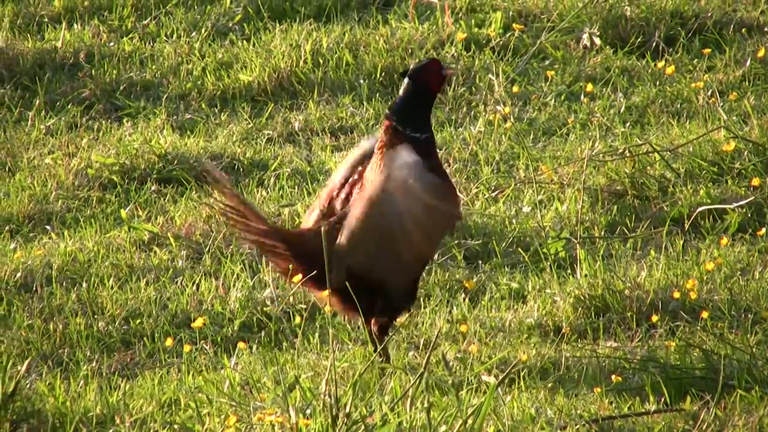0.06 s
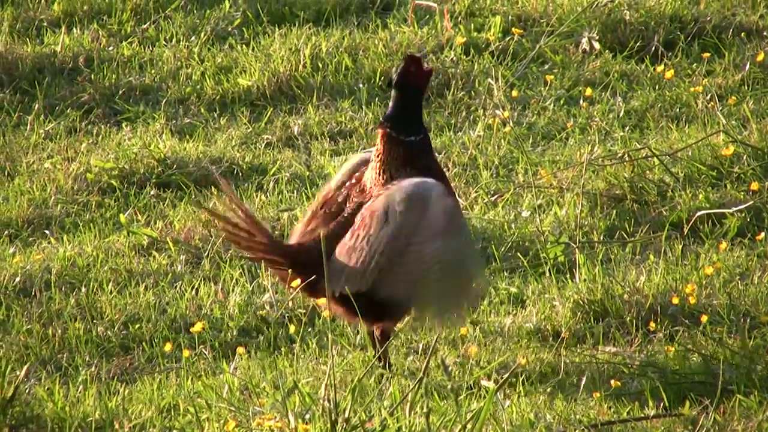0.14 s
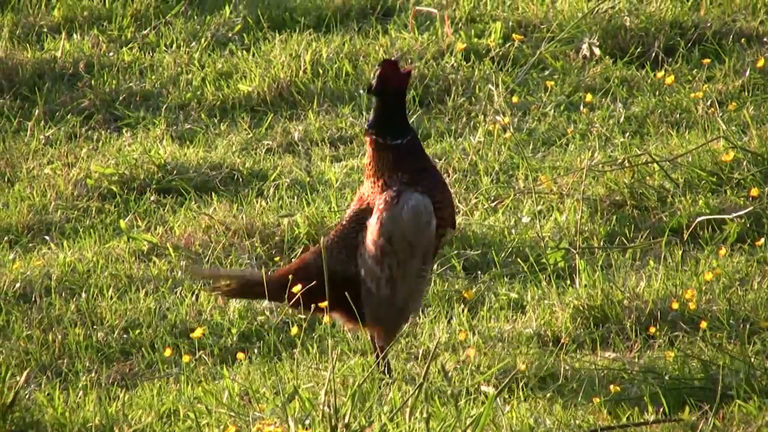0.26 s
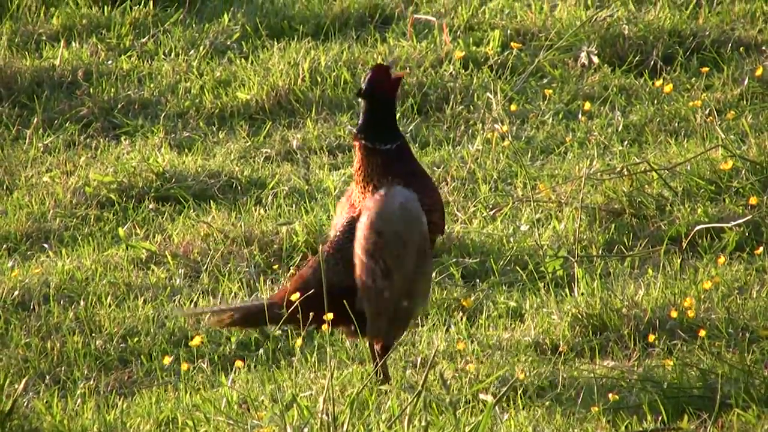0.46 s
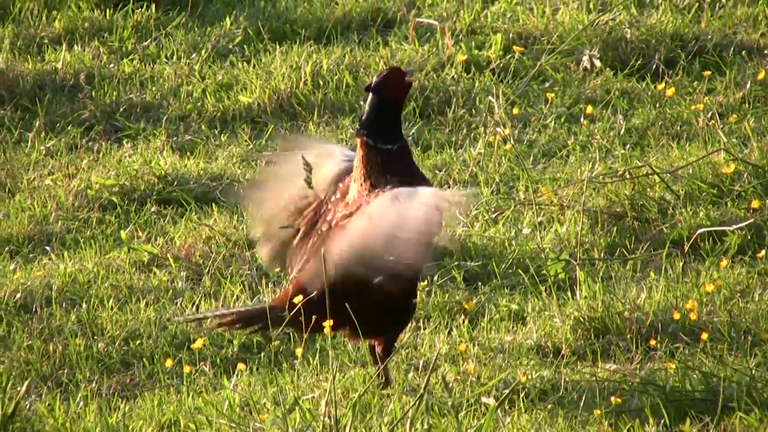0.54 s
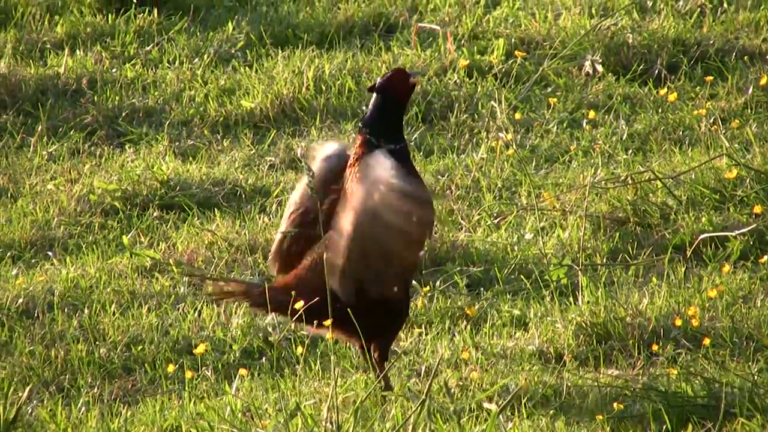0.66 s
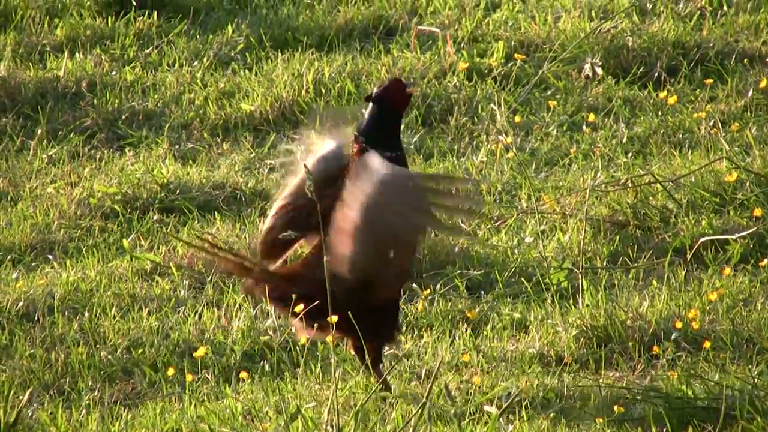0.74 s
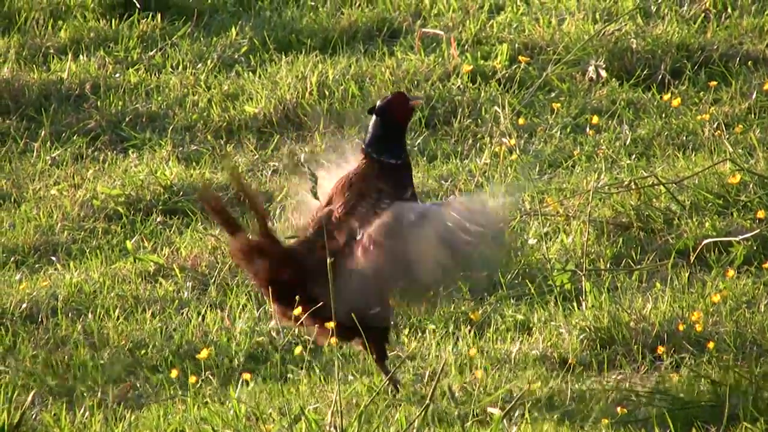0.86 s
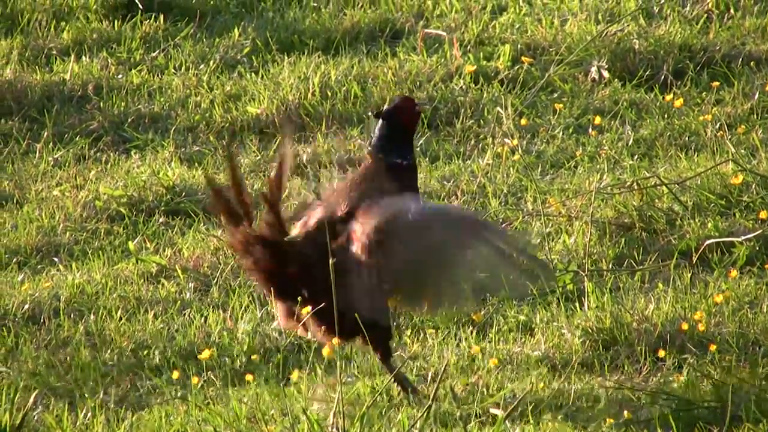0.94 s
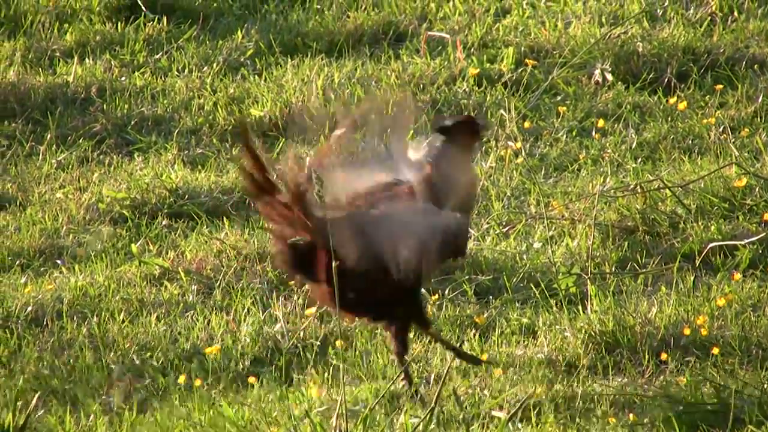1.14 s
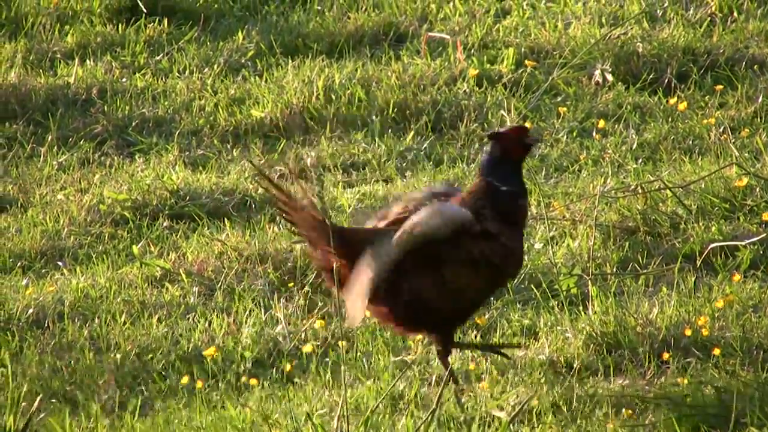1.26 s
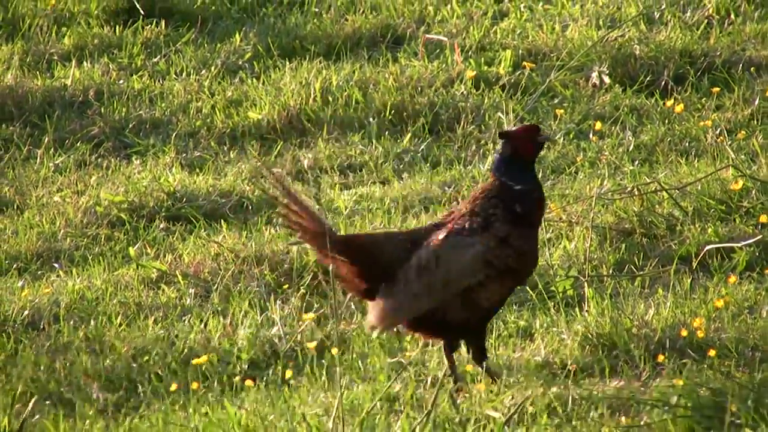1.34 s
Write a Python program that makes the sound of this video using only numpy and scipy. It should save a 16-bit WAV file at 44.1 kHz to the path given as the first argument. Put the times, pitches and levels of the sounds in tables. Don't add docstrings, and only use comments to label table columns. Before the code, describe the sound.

A cock pheasant close by gives a harsh, raspy two-note crow, then a fast run of soft, thumping, feathery wingbeats. Open meadow, faint hedge echoes, quiet insect hiss and distant wash, stereo microphone.

```python
import sys
import numpy as np
from scipy import signal
from scipy.fft import rfft, irfft
from scipy.io import wavfile
from scipy.ndimage import uniform_filter1d

SR = 44100
rng = np.random.default_rng(int(sys.argv[2]) if len(sys.argv) > 2 else 0)


def master_out(mix):
    frames = np.transpose(np.atleast_2d(mix))
    ceiling = np.clip(frames, -1, 1)
    pcm = np.round(ceiling * 32767).astype(np.int16)
    wavfile.write(sys.argv[1], SR, pcm)


def natural_amplitude(level_db):
    exponent = np.asarray(level_db, float) / 20
    return 10 ** exponent


N = 61739


def evened(x):
    return x / np.sqrt(np.mean(abs(x) ** 2) + 1e-20)


def read(points, hz):
    f, value = np.transpose(points)
    return np.interp(np.log(hz + 1), np.log(f + 1), value)


def add(mix, s, sound):
    part = mix[round(s * SR):][:len(sound)]
    part += sound[:len(part)]


def smooth(x, width_hz):
    r = np.exp(-np.pi * abs(width_hz) / SR)
    return signal.lfilter([1 - r], [1, -r], x)


def resonate(x, hz, width_hz):
    turn = np.exp(2j * np.pi * np.cumsum(hz * np.ones(len(x))) / SR)
    return 2 * (turn * smooth(smooth(x / turn, width_hz), width_hz)).real


def coloured(x, spectrum):
    gain = natural_amplitude(read(spectrum, np.fft.rfftfreq(x.shape[-1], 1 / SR)))
    return irfft(rfft(x) * gain, x.shape[-1])


RING_PER_PULSE, THIRD_DB = 3, -18
JITTER_TURNS, SHIMMER_DB, BREATH_SHARE, WANDER_HZ = .4, 2.2, .42, 110.
STRETCH_FROM_HZ, EDGE_S, DULLING_DB_PER_OCTAVE_DB = 2500, .004, .3
# f/Hz, width/Hz, level/dB
HISS = [(2400, 3300, -27.5), (4480, 3530, -20.5), (12000, 340, -35)]


def note(rows, looseness, stretching, pipe):
    t, columns = np.arange(N) / SR, np.transpose(rows)
    times = columns[0]
    hz, ring_db, rasp_db = (np.interp(t, times, c) for c in columns[1:])
    on = np.clip(np.minimum(t - times[0], times[-1] - t) / EDGE_S, 0, 1)
    loose, stretch = np.interp(t, times, looseness), np.interp(t, times, stretching)
    a, b, jitter, shimmer, breath = rng.standard_normal((N, 5)).T

    wobble = evened(smooth(smooth(a + 1j * b, WANDER_HZ), 2 * WANDER_HZ))
    wobble = evened(wobble / np.sqrt(abs(wobble) + 1e-9))
    angle = 2 * np.pi * np.cumsum(hz) / SR
    footing = np.sqrt(1 - loose ** 2) + loose * wobble
    ring = np.sqrt(2) * (footing * np.exp(1j * angle)).real
    ring += natural_amplitude(THIRD_DB) * (1 - loose) * np.cos(3 * angle)

    turns = angle / (2 * np.pi * RING_PER_PULSE)
    turns += JITTER_TURNS * loose * evened(smooth(smooth(jitter, 300), 300))
    pulses = (np.diff(np.floor(turns), prepend=0) != 0) * natural_amplitude(SHIMMER_DB * loose * shimmer)
    puffs = (.35 + np.exp(-(turns % 1) / .35)) * breath
    share = BREATH_SHARE * np.sqrt(loose)
    drive = (1 - share) * evened(pulses) + share * evened(puffs)

    slack_db = DULLING_DB_PER_OCTAVE_DB * np.maximum(rasp_db - rasp_db.max(), -15)
    rasp = np.zeros(N)
    for k, (f, width, db) in enumerate(pipe):
        gain = (-1) ** k * natural_amplitude(db + slack_db * max(np.log2(f / 3000), 0))
        moving_hz = f * stretch ** (f > STRETCH_FROM_HZ)
        rasp += gain * resonate(drive, moving_hz, width)
    for f, width, db in HISS:
        rasp += natural_amplitude(db + slack_db) * resonate(a, f, width)
    return on * (natural_amplitude(ring_db) * ring + natural_amplitude(rasp_db) * evened(rasp))


# t/s, ring f/Hz, ring level/dB, rasp level/dB
NOTE_1 = [
    (.219, 1096, -44, -66),
    (.229, 1132, -23, -26.5),
    (.26, 1139, -19, -19),
    (.315, 1187, -18, -18),
    (.345, 1137, -19.5, -19.5),
    (.37, 1155, -13, -20.5),
    (.415, 1124, -17, -23),
    (.437, 1120, -15, -31),
    (.448, 1130, -50, -32),
]
NOTE_2 = [
    (.515, 1116, -53, -38.5),
    (.524, 1123, -16, -26),
    (.553, 1129, -11, -21),
    (.563, 1325, -24, -21),
    (.6, 1159, -19, -24.5),
    (.636, 1135, -16.5, -31.5),
    (.685, 1100, -21, -35),
    (.708, 1094, -30, -42),
    (.742, 1080, -48, -43),
]
LOOSE_1 = [.8, .8, .8, .7, .8, .5, .22, .12, .12]
LOOSE_2 = [.05, .04, .1, .85, .3, .07, .07, .1, .15]
STRETCH_1 = [.96, .995, 1, 1, 1, 1.015, 1.01, 1, 1]
STRETCH_2 = [.97, .99, 1.01, 1, 1.015, 1, 1, 1, 1]
# f/Hz, width/Hz, level/dB
PIPE_1 = [(794, 63, -11.5), (920, 55, -17), (1387, 350, -8.5), (1942, 320, -6), (2872, 168, -7),
          (3370, 240, -11.5), (3780, 230, -5), (4065, 176, -6.5), (4880, 230, -9), (5390, 250, -8.5),
          (6030, 60, -8.5), (6694, 205, -9), (7130, 590, -19), (9850, 1800, -30.5)]
PIPE_2 = [(722, 65, -6), (890, 150, -3.5), (1365, 350, -8), (1912, 336, -0.5), (3020, 270, -5.5),
          (3390, 46, -5), (3716, 230, 2.5), (4053, 190, -1), (4820, 680, -6), (5630, 490, -8),
          (6400, 580, -11.5), (7040, 270, -7), (7530, 260, -19), (9800, 1750, -21)]


def two_notes():
    return note(NOTE_1, LOOSE_1, STRETCH_1, PIPE_1) + note(NOTE_2, LOOSE_2, STRETCH_2, PIPE_2)


def squeal(rows, octave_db, top_db=-90, waver_hz=88):
    t, (s, hz, db) = np.arange(N) / SR, np.transpose(rows)
    a, b = rng.standard_normal((N, 2)).T
    waver = 1 + .5 * evened(smooth(smooth(a + 1j * b, waver_hz), waver_hz))
    angle = 2 * np.pi * np.cumsum(np.interp(t, s, hz)) / SR
    tone = np.exp(1j * angle)
    tone += natural_amplitude(octave_db) * waver * np.exp(2j * angle)
    tone += natural_amplitude(top_db) * waver * np.exp(2.5j * angle)
    return natural_amplitude(np.interp(t, s, db, left=-120, right=-120)) * (waver * tone).real


# t/s, f/Hz, level/dB
SQUEAL = [(.524, 2960, -65), (0.533, 3051, -46), (0.553, 3020, -35), (.562, 2775, -24.5),
          (0.579, 2888, -25), (0.599, 3040, -33), (.612, 3193, -100)]
# t/s, f/Hz, level/dB
SCREAM_1 = [(.218, 3840, -69), (.227, 4030, -26), (.25, 4104, -26), (.29, 4065, -20), (.335, 4042, -23),
            (.36, 4170, -30), (.41, 4130, -39), (.44, 4107, -41)]
SCREAM_2 = [(0.515, 3900, -42), (.526, 4040, -35), (0.539, 4150, -30), (.555, 4140, -25.5), (.6, 4200, -33),
            (.65, 4120, -43), (.7, 4100, -57)]
# t/s, f/Hz, level/dB
UPPER = [(.228, 1250, -50), (.238, 1267, -23.5), (.27, 1235, -16), (.3, 1244, -24), (.325, 1294, -24),
         (.37, 1293, -37), (.4, 1280, -57)]
LOWER = [(.216, 944, -67), (.226, 931, -34.5), (.25, 883.5, -35), (.28, 830, -30.5), (.32, 853, -33),
         (.35, 769.4, -31.5), (.39, 704, -27.5), (.43, 720, -54)]
# f/Hz, level/dB
LOW_CUT = [(300, -36), (600, -18), (720, -2), (960, 1.5), (1010, -10), (1080, 0.5)]


def crow():
    voice = two_notes()
    voice += squeal(SQUEAL, octave_db=-8, top_db=-9)
    voice += squeal(SCREAM_1 + SCREAM_2, octave_db=-23.5)
    voice += squeal(UPPER, octave_db=-36) + squeal(LOWER, octave_db=-40)
    return coloured(voice, LOW_CUT)


THUMP_HZ, THUMP_WIDTH_HZ, THUMP_DB, WHOOMP_LAG_S, WHOOMP_S = 120, 150, -12.5, .012, .014
UP_LAG_S, UP_DB, UP_SWISH_DB = .046, -4, -10
SWISH_DB, BEAT_RISE_S, SWISH_FALL_S = -2.5, .0032, .021
SLAP_DB, SLAP_S, PUSH_DB, PUSH_HZ, PUSH_S = -2, .0016, -7.5, 115, .0081
# t/s, thump level/dB, swish level/dB, slap lag/s, slap level/dB
BEATS = [
    (0.753, -48, -44, .0125, -43),
    (0.817, -24, -44.5, 0.013, -28.5),
    (0.883, -20, -37.5, 0.021, -23.5),
    (0.954, -30, -36, 0.011, -20.5),
    (1.025, -22.5, -36.5, 0.015, -19.5),
    (1.097, -23.5, -36.5, 0.0146, -21),
    (1.167, -23, -40.5, 0.016, -24),
    (1.235, -34, -42.5, 0.016, -28),
]
# t/s, level/dB, f/Hz
TICKS = [(.881, -33, 1200), (.889, -31, 1500), (.919, -34, 6000), (.9545, -24, 1500), (.956, -31, 3000),
         (.9645, -28, 1900), (.9855, -26, 9500), (.9857, -31, 6800), (.9855, -30, 4500), (.986, -33, 2400),
         (1.027, -33, 2800), (1.042, -33, 2200), (1.059, -33, 3000), (1.069, -40, 5000), (1.238, -37, 3200),
         (1.099, -31, 2900), (1.166, -36, 3200), (1.1695, -23, 1500), (1.170, -26, 2900),
         (1.282, -41, 4000)]
# f/Hz, level/dB per Hz
FEATHERS = [(150, 3.5), (250, 2), (533, -11.5), (1470, -11), (2310, -22.5), (2830, -20), (6240, -31.5),
            (9500, -28), (14000, -58)]


def wings():
    t, tick_t = np.arange(N) / SR, np.arange(200) / SR
    low_noise, feather_noise, flutter = rng.standard_normal((N, 3)).T
    low, high, slaps = np.zeros((3, N))
    for s, thump_db, swish_db, slap_lag_s, slap_db in BEATS:
        strokes = [(0, 0, 0), (UP_LAG_S, UP_DB, UP_SWISH_DB)]
        if s >= BEATS[-1][0]:
            strokes = strokes[:1]
        for lag_s, db, hiss_db in strokes:
            u = t - s - lag_s
            bump = np.exp(-((u - WHOOMP_LAG_S) / WHOOMP_S) ** 2 / 2)
            low += natural_amplitude(thump_db + db + THUMP_DB) * bump
            rise = np.exp(np.minimum(u, 0) / BEAT_RISE_S)
            fall = np.exp(-np.maximum(u, 0) / SWISH_FALL_S)
            high += natural_amplitude(swish_db + hiss_db + SWISH_DB) * rise * fall
        u = t - s - slap_lag_s
        push = np.cos(2 * np.pi * PUSH_HZ * u) * np.exp(-(u / PUSH_S) ** 2 / 2)
        slaps -= natural_amplitude(slap_db + PUSH_DB) * push
        v = u / SLAP_S
        slaps += natural_amplitude(slap_db + SLAP_DB) * (v ** 2 - 1) * np.exp(-v ** 2 / 2)
    for s, db, hz in TICKS:
        tick = np.sin(2 * np.pi * hz * tick_t) * np.exp(-tick_t * hz / 1.7)
        add(slaps, s, natural_amplitude(db) * tick)
    whoomp = evened(resonate(low_noise, THUMP_HZ, THUMP_WIDTH_HZ))
    whoomp += natural_amplitude(-8.0) * evened(resonate(low_noise, 220, 87))
    rustle = coloured(feather_noise * natural_amplitude(2 * evened(smooth(flutter, 410))), FEATHERS)
    rustle /= np.std(resonate(rustle, 2580, 4490))
    return low * whoomp + slaps + high * rustle


TAIL_DB, SMEAR_DB = -13, -4.5
# delay t/s, level/dB
ECHOES = [
    (.062, -19.5),
    (.125, -30),
    (.187, -32.5),
    (.252, -34),
]
# f/Hz, t60/s
TAIL = [(500, 0.65), (1200, 0.18), (4000, 0.7), (9000, 0.59)]
# f/Hz, level/dB
WIDE = [(100, -18), (1100, -19.5), (2500, -52), (5000, -11), (9000, -9), (14000, 3)]
TAIL_WIDE = [(100, -16), (1100, -12), (4000, -5), (10000, -1)]


def meadow(x):
    hz, t, z = signal.stft(rng.standard_normal((2, SR)), SR, nperseg=256)
    t60_s = np.maximum(read(TAIL, hz), .05)[:, None]
    tail = signal.istft(z * natural_amplitude(-60 * t / t60_s), SR, nperseg=256)[1][:, :SR]
    tail = natural_amplitude(TAIL_DB) * tail / np.linalg.norm(tail[0])
    blur = rng.standard_normal((len(ECHOES), 2, 300)) * np.hanning(300)
    for (s, db), pair in zip(ECHOES, blur):
        for channel, smear in zip(tail, pair):
            add(channel, s, natural_amplitude(db + SMEAR_DB) * evened(smear) / np.sqrt(len(smear)))
        add(tail[0], s, natural_amplitude(db) * np.hanning(5) / 2)
    mid, side = signal.fftconvolve(x[None], tail, axes=1)[:, :N]
    spread = rng.standard_normal(size=40) * np.hanning(40)
    direct_side = np.convolve(x, spread / np.linalg.norm(spread))[:N]
    side = coloured(side, TAIL_WIDE) + coloured(direct_side, WIDE)
    return np.array([mid + side, mid - side])


INSECT_HZ, INSECT_WIDTH_HZ, INSECT_DB = 8200, 670, -62.5
# t/s, length/s, f/Hz, level/dB
SEEPS = [
    (1.13, .18, 7250, -58),
    (1.29, .11, 4750, -65),
    (1.275, .055, 800, -50),
]
# t/s, f/Hz, level/dB, t60/s
LINGER = [
    (.703, 3660, -31, 0.18),
    (.703, 4210, -38.5, 0.29),
    (.775, 3720, -51.5, 0.89),
]


def small_sounds():
    noise, birds = rng.standard_normal((N, 3)).T, np.zeros(N)
    for s, length_s, hz, db in SEEPS:
        t = np.arange(0, length_s, 1 / SR)
        swell = np.sin(np.pi * t / length_s) ** 0.29
        add(birds, s, natural_amplitude(db) * swell * evened(resonate(noise[2, :len(t)], hz, 120)))
    for s, hz, db, t60_s in LINGER:
        t = np.arange(0, .2, 1 / SR)
        drift = noise[2, round(s * SR):][:len(t)]
        waver = 1 + .35 * evened(smooth(smooth(drift, 60), 60))
        fade = natural_amplitude(db - 60 * t / t60_s) * np.minimum(t / 0.0033, 1)
        add(birds, s, fade * waver * np.sin(2 * np.pi * hz * t))
    insects = [natural_amplitude(INSECT_DB) * evened(resonate(v, INSECT_HZ, INSECT_WIDTH_HZ)) for v in noise[:2]]
    return np.array(insects) + birds * natural_amplitude(np.array([[1.], [-1.]]))


WASH_DB, PATCH_DB = -39.5, 0.93
# f/Hz, level/dB per Hz
WASH = [(15, -38), (25, -5.5), (482, -8.5), (631, -6), (1490, -16.5), (2700, -27), (3260, -30),
        (8350, -35.5), (15500, -39.5)]
# f/Hz, left-right likeness (0-1)
SAME = [(40, 0.77), (240, 0.6), (950, 0.86), (3770, 0.69), (15000, 0.043)]


def wash():
    frames, hz = N // 256 + 5, np.fft.rfftfreq(1024, 1 / SR)
    a, b, c, d, patches = rng.standard_normal((frames, 513, 5)).T
    patches = uniform_filter1d(uniform_filter1d(patches, size=12, axis=0), size=14, axis=1)
    same = np.clip(read(SAME, hz), -1, 1)[:, None]
    left = a + 1j * b
    right = same * left + np.sqrt(1 - same ** 2) * (c + 1j * d)
    z = np.array([left, right]) * natural_amplitude(read(WASH, hz)[:, None] + PATCH_DB * evened(patches))
    return natural_amplitude(WASH_DB) * evened(signal.istft(z, nperseg=1024, noverlap=768)[1][:, :N])


def scene():
    voice, beat = crow(), wings()
    near = voice * natural_amplitude(np.array([[-.3], [.3]])) + beat
    return near + meadow(voice + beat) + wash() + small_sounds()


def top_cut(x):
    return signal.sosfilt(signal.butter(12, 15690, fs=SR, output="sos"), x)


EDGE_HZ, DUCK_FROM_DB, DUCK_SHARE, DUCK_S = 15700, -20, 0.24, 0.022
# f/Hz, level/dB
MIC = [(15, -32), (32, -8), (50, -1.5), (11000, 0), (12500, -5.5), (13500, -12), (16000, -24)]


def record(dry):
    power = abs(uniform_filter1d((dry ** 2).mean(0), size=1300))
    over_db = np.maximum(10 * np.log10(power + 1e-12) - DUCK_FROM_DB, 0)
    ducked = dry / natural_amplitude(DUCK_SHARE * smooth(over_db, 1 / (np.pi * DUCK_S)))
    band_limit = signal.firwin(511, EDGE_HZ, fs=SR)[None]
    mix = signal.oaconvolve(coloured(ducked, MIC), band_limit, "same")
    return top_cut(mix)


dry = scene()
out = record(dry)
master_out(out)
```